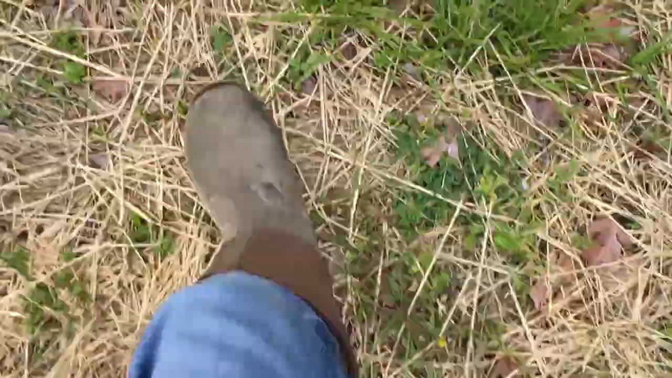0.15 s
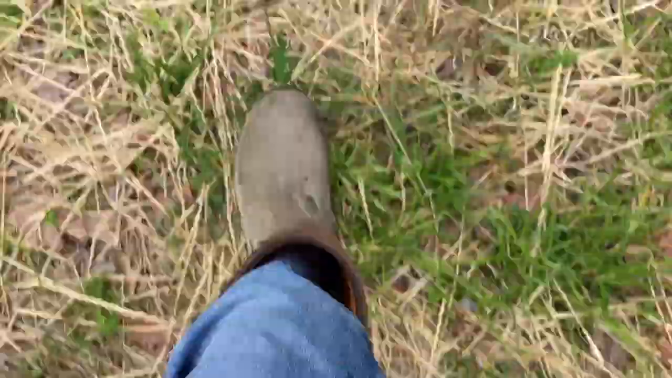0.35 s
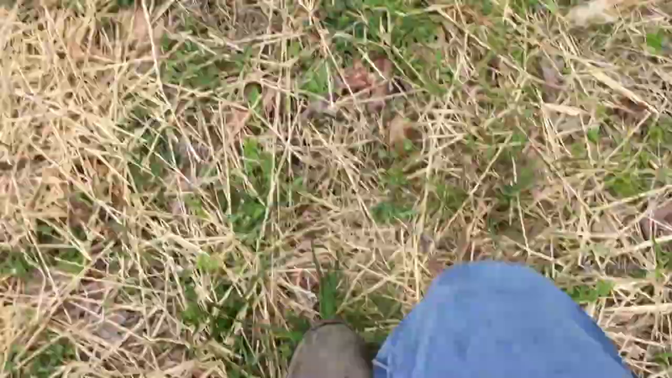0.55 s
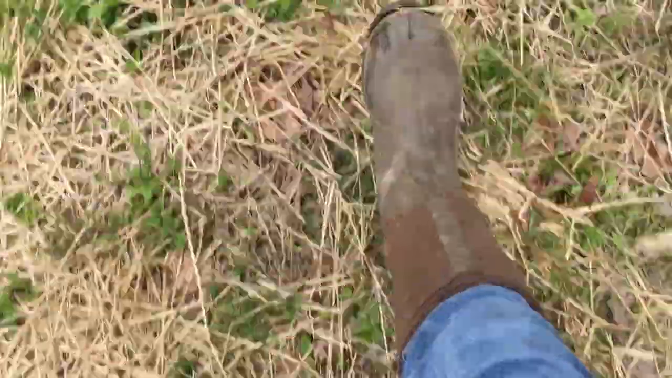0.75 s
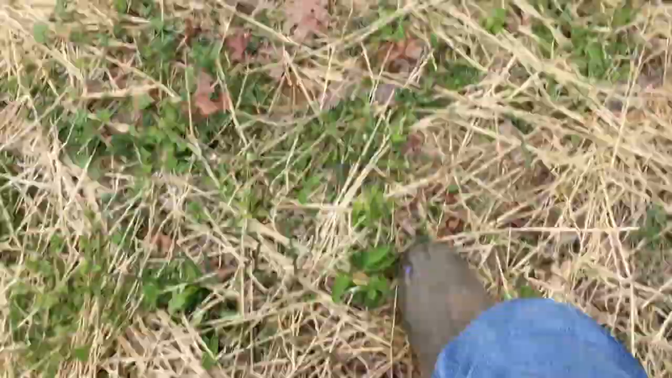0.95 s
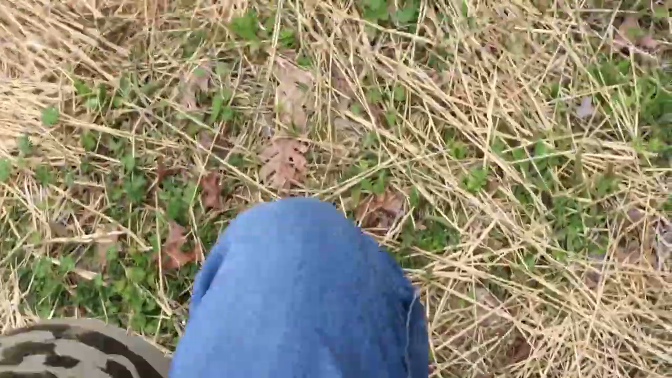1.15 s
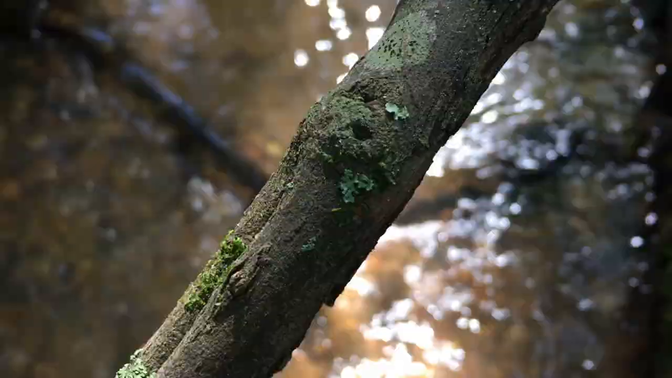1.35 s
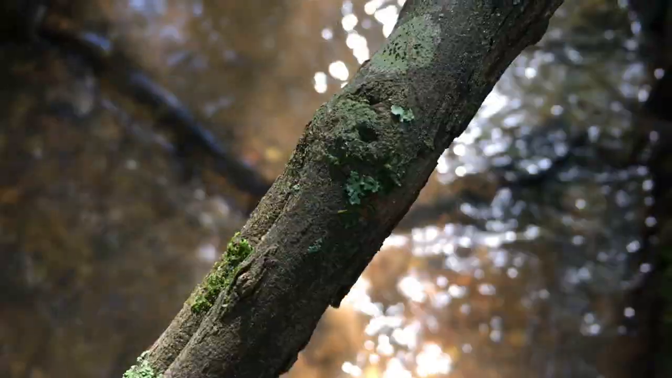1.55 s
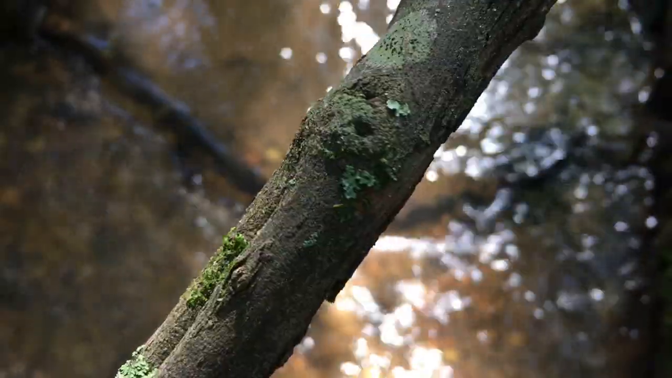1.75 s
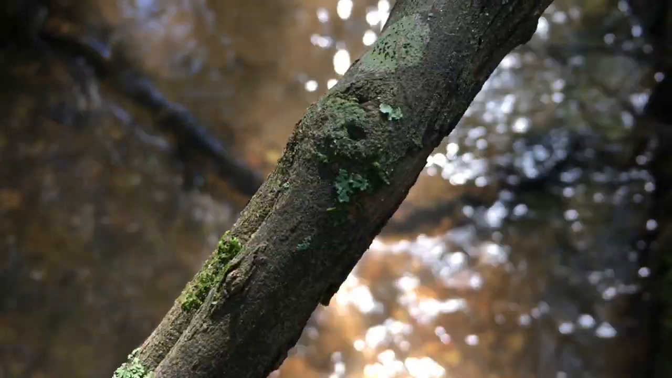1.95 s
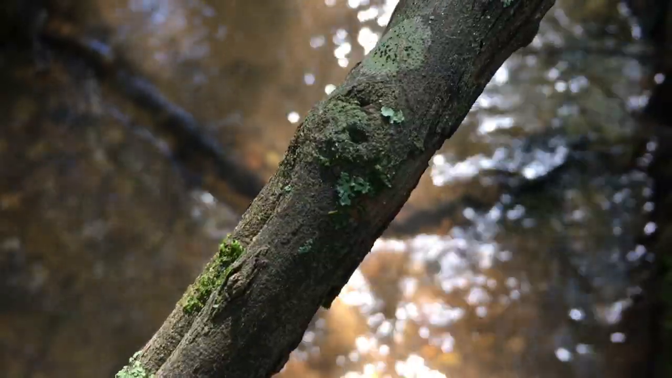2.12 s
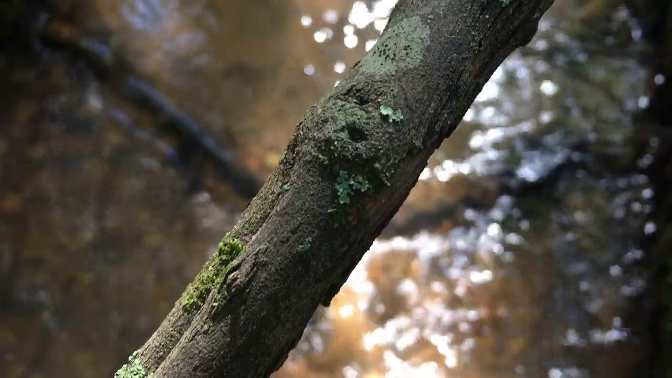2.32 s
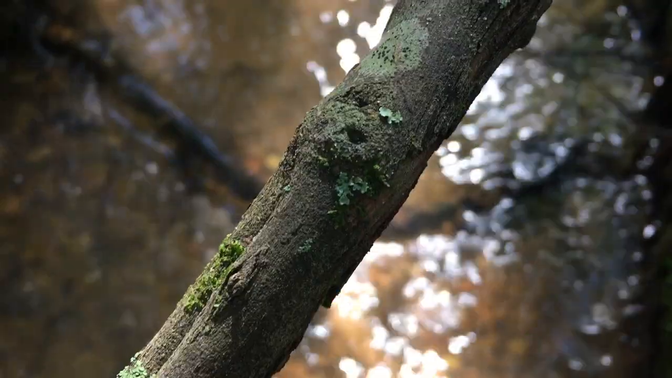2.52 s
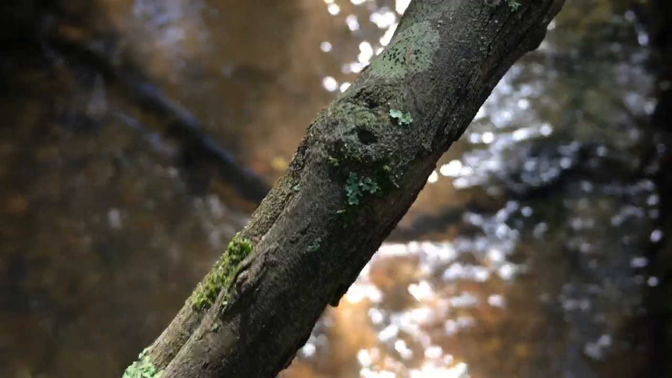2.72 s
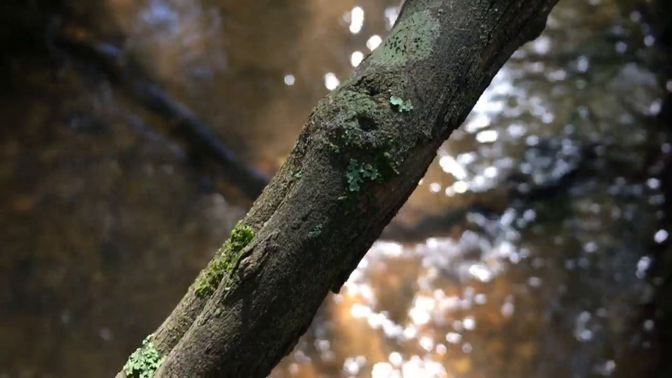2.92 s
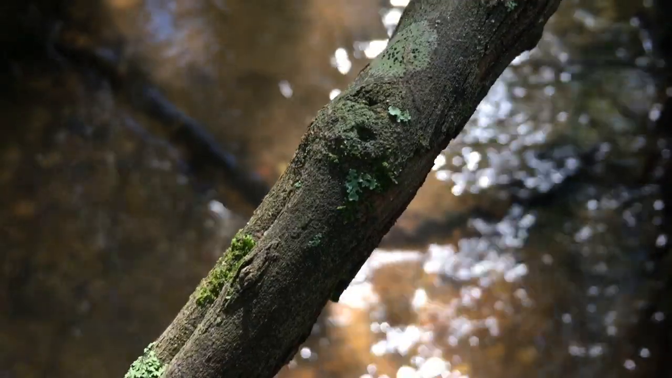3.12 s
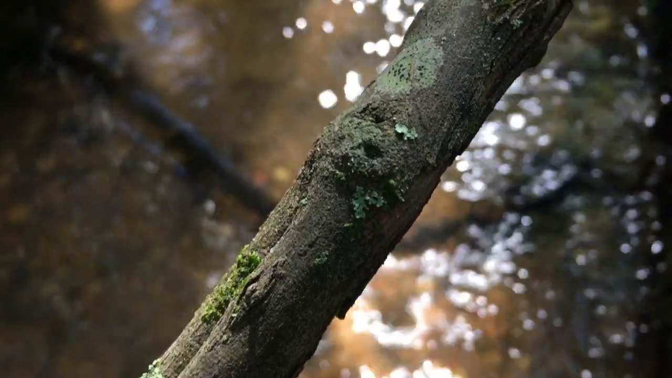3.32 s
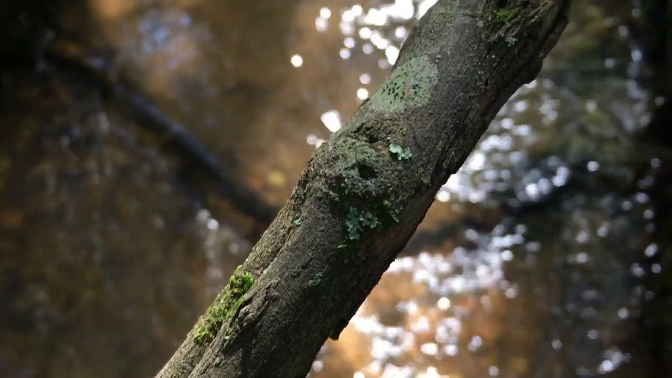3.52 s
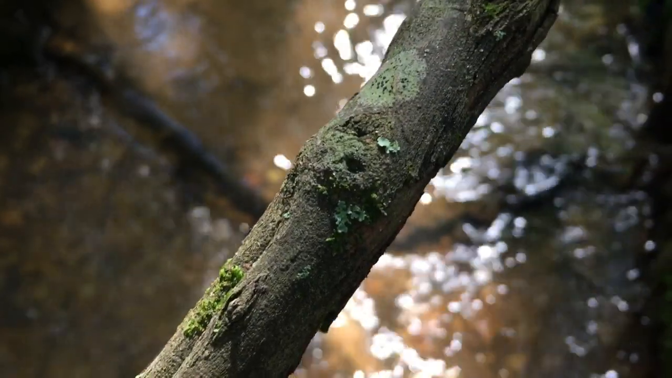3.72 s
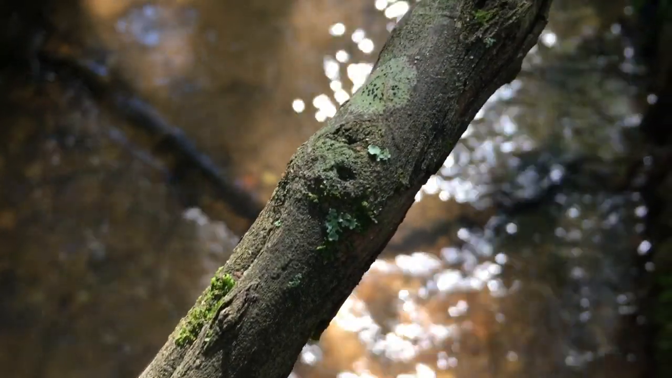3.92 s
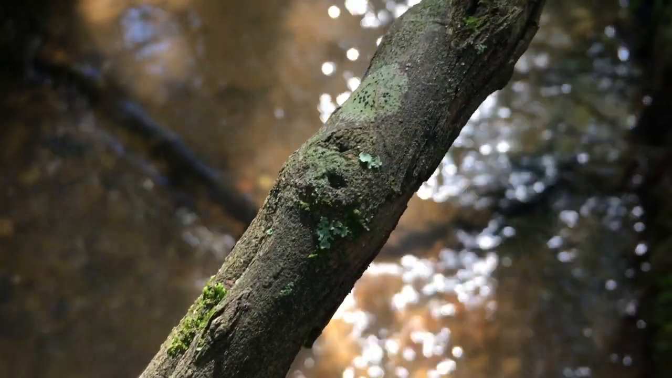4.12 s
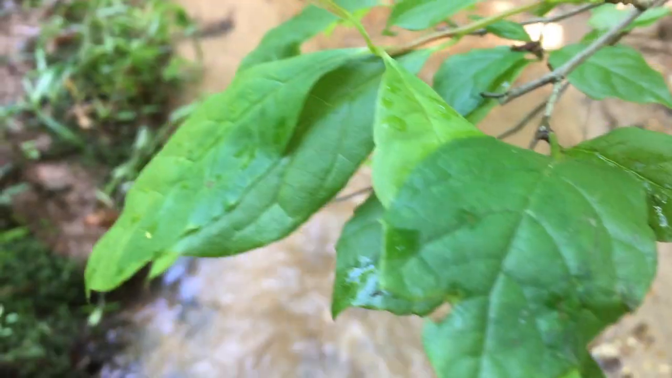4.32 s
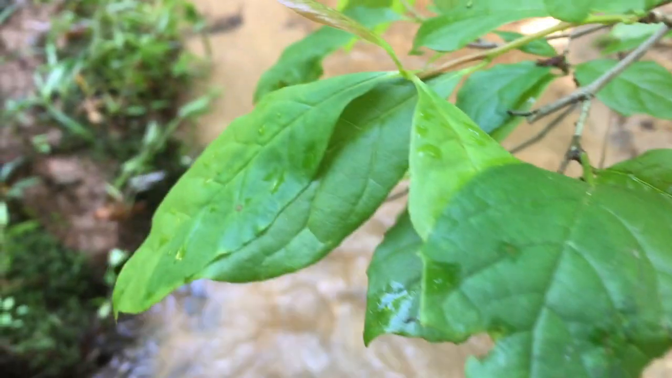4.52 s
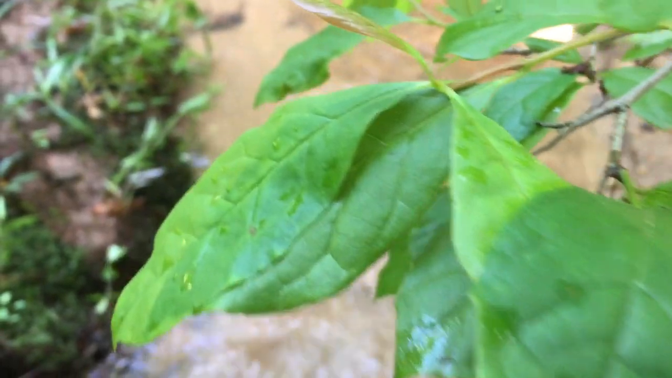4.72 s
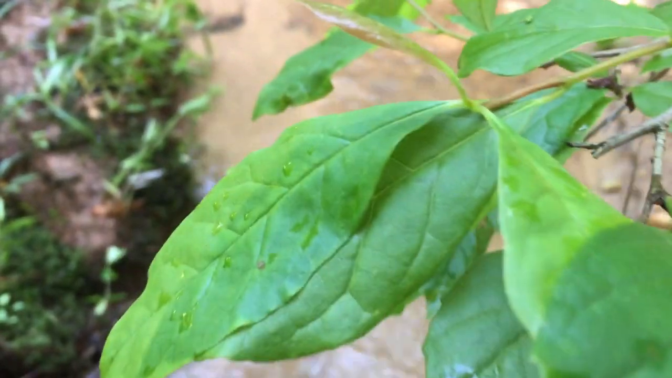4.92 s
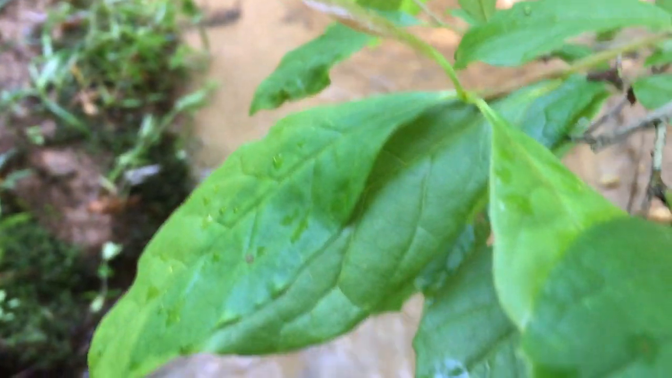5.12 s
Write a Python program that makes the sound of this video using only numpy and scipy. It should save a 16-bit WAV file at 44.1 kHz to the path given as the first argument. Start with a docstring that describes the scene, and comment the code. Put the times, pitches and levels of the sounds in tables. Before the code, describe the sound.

Mono, close and dry, outdoors. From 0 to 1.4 s rubber boots walk through dry grass and straw. A footfall lands right at the start, another around 0.4-0.5 s and a third near 0.97-1.05 s: heel then sole, dull, short thuds with brittle crunching and stalk snaps. Trouser cloth swishes briefly, brightening, at about 0.05, 0.63 and 1.13 s. Blades brush the boot between steps, strongest from 0.8 to 1.0 s, with a sharp, bright stem whip at 0.84 s. Low rumble follows the stride. At 1.44 s it cuts abruptly to a much quieter creek: a soft, steady wash, faint random trickling and tiny high ticks. Clearer liquid plinks sound near 2.06, 2.37, 3.33, 4.22 and 4.32 s, with a dull drop click at 3.5 s. Small bubbles grow denser after 4.6 s, with a slightly fizzier wash. Lumpy low outdoor rumble slowly grows and surges until about 5.3 s.

```python
"""First, rubber boots walk through dry grass and straw: noise-burst snaps and shaped crackle for stalks,
damped sine thuds for heels, resonant noise for a whipped stem and swishing trouser legs.
Then, abruptly, a quiet creek: a soft noise wash with small ringing bubbles (sines drifting in pitch),
ticking drops and faint sliding tones, over a low outdoor rumble of lumpy, surging noise."""
import sys
import numpy as np
from scipy import signal
from scipy.fft import rfft, irfft, next_fast_len
from scipy.io import wavfile
from scipy.ndimage import map_coordinates

SR = 44100
rng = np.random.default_rng(int(sys.argv[2]) if len(sys.argv) > 2 else 0)


def to_wav(s):
    """Save 16-bit WAV."""
    ch = np.atleast_2d(s).T  # columns
    pcm = np.round(np.clip(ch, -1, 1) * 32767)  # PCM
    wavfile.write(sys.argv[1], SR, pcm.astype(np.int16))


N = 232318
WALK_END_S = 1.437

# near bubbles in the creek: t/s, level/dB, nominal f/Hz, share by which pitch rises per ring time
BUBBLES = [(1.771, -61, 6060, 0), (2.033, -45, 1380, -0), (2.061, -32.5, 2280, -0.24),
           (2.2085, -58, 1940, 0), (2.212, -55, 4650, -0.1), (2.2445, -56.5, 3270, 0.2),
           (2.342, -50.5, 2210, -0), (2.3669, -37.5, 2660, 0.12), (2.7399, -56, 5900, -0.2),
           (2.896, -57.5, 1640, 0.25), (3.0428, -51.5, 3150, -0.1), (3.0525, -54, 3320, 0.09),
           (3.106, -48.5, 2324, 0.45), (3.106, -57.5, 1840, -0.2), (3.3262, -39.5, 1261, 0.49),
           (3.364, -56, 1255, 0.45), (3.792, -57, 2940, 0.3), (4.078, -49, 2236, 0.17),
           (4.2178, -37, 1784, -0.2), (4.2182, -48, 2560, -0.15), (4.229, -49.5, 2180, 0.3),
           (4.3174, -40, 2860, -0.2), (4.612, -47, 1460, -0.76), (4.6202, -56.5, 1065, -0.03),
           (4.66, -56, 1136, -0), (4.6727, -57, 2870, 0), (4.7206, -51.5, 3990, -0),
           (4.7272, -51, 2000, -0.4), (4.9153, -46, 1700, -0), (4.9253, -55.5, 3640, 0.2),
           (5.038, -59.5, 1170, 0.47), (5.0749, -48, 2540, 0.2), (5.1196, -51.5, 1843, -0.16),
           (5.1273, -50.5, 3710, 0.2), (5.141, -45.5, 4280, -0.1), (5.183, -54, 1190, 0.13)]
# steps, heel strike until sole lies flat: heel t/s, flat t/s, level/dB
STEPS = [(0.42, 0.48, -44.5), (0.974, 0.995, -40)]
STEP_RISE_DB_PER_S, STEP_FALL_DB_PER_S = 480, 340


def amp(db):
    """Decibels to gain."""
    return 10 ** (np.asarray(db) / 20)


def unit(x):
    """x at rms 1."""
    return x / np.sqrt(np.mean(x ** 2) + 1e-20)


def clock():
    """Time of every sample in s."""
    return np.arange(N) / SR


def curves(rows):
    """One value per sample for each column after the time."""
    s, *cols = np.transpose(rows)
    return [np.interp(clock(), s, c) for c in cols]


def wobble(knots_per_s):
    """Smooth random curve through normal knots."""
    knots = rng.standard_normal(int(N * knots_per_s / SR) + 4)
    return map_coordinates(knots, [np.arange(N) * knots_per_s / SR])


def filtered(x, response):
    """x times a complex response of frequency."""
    m = next_fast_len(len(x) + SR // 10)
    return irfft(rfft(x, m) * response(np.fft.rfftfreq(m, 1 / SR)), m)[:len(x)]


def shaped(x, points):
    """x through a filter of (f/Hz, level/dB) points that leaves white noise at its level."""
    f, db = np.transpose(points)
    return filtered(x, lambda hz: unit(amp(np.interp(np.log(hz + 1), np.log(f), db))))


def coloured(x, points):
    """x shaped by (f/Hz, level/dB) points, at rms 1."""
    return unit(shaped(x, points))


def resonance(f, hz, width_hz):
    """Response of one damped mode."""
    return 1j * f * width_hz / (hz * hz - f * f + 1j * f * width_hz)


def resonant_noise(count, hz, breadth):
    """Noise through a doubled mode whose width is breadth times its frequency."""
    return filtered(rng.standard_normal(count), lambda f: resonance(f, hz, breadth * hz) ** 2)


def add(track, s, sound):
    """Mix a sound into the track at time s."""
    part = track[max(round(s * SR), 0):][:len(sound)]
    part += sound[:len(part)]


def together(*gains):
    """Gain of unrelated sounds heard at once: powers add."""
    return np.sqrt(sum(g ** 2 for g in gains))


def swells(rows, rise_db_per_s, fall_db_per_s):
    """Gain of events that rise, hold from start to end and fall away."""
    t = clock()
    gains = []
    for start, end, db in rows:
        before = rise_db_per_s * np.maximum(start - t, 0)
        after = fall_db_per_s * np.maximum(t - end, 0)
        gains.append(amp(db - before - after))
    return together(*gains)


def crackle(rate_per_s, spread_db, rub):
    """Tiny fractures of uneven size on a bed of rubbing noise, rms 1."""
    sizes = amp(spread_db * np.minimum(rng.standard_normal(N), 2)) * rng.choice([-1, 1], N)
    fractures = unit(sizes * (rng.random(N) < rate_per_s / SR))
    return unit(fractures + rub * rng.standard_normal(N))


def cracks(rows, breadth):
    """Short noise bursts, each through its own broad resonance and an exponential decay."""
    out, t = np.zeros(N), np.arange(SR // 10) / SR
    for s, db, hz, t60_s in rows:
        burst = amp(-60 * t / t60_s) * resonant_noise(len(t), hz, breadth)
        add(out, s, amp(db - 3.5) * burst / np.abs(burst).max())
    return out


def outdoor_rumble():
    """Low noise whose level grows slowly, wavers in lumps and surges."""
    # spectrum: f/Hz, level/dB
    spectrum = [(20, -60), (30, -41), (40, -5.5), (52, -10), (72, 0.5), (84, -2), (97, -7), (150, -23.5),
                (300, -50), (800, -92)]
    # surges: start t/s, end t/s, level/dB
    surges = [(3.05, 3.085, -54), (3.32, 3.46, -52), (3.7, 3.72, -47), (3.83, 3.86, -48),
              (4.48, 4.52, -53.5), (5.08, 5.18, -54)]
    start_db, growth_db_per_s, lump_db, lumps_per_s, surge_db_per_s = -58.5, 0.56, 3.5, 27, 370
    level_db = start_db + growth_db_per_s * (clock() - WALK_END_S) + lump_db * wobble(lumps_per_s)
    gain = together(amp(level_db), swells(surges, surge_db_per_s, surge_db_per_s))
    return shaped(gain * rng.standard_normal(N), spectrum)


def stream():
    """The wash of the stream as wavering noise, with a fine crackling fizz."""
    # flow: t/s, wash level/dB, fizz level/dB
    flow = [(1.44, -68.5, -96), (3.0, -68.5, -84), (4.33, -68, -108), (4.45, -70, -77), (4.8, -68.5, -75),
            (5.27, -69.5, -74)]
    # wash spectrum: f/Hz, level/dB
    wash_spectrum = [(60, -10), (200, 8.5), (300, 4.5), (420, -1), (850, 4.5), (1400, -2), (2200, -6),
                     (4000, -8.5), (4900, -11.5), (6000, -11), (9300, -14), (10400, -18), (11500, -15),
                     (15800, -20)]
    fizz_spectrum = [(500, -34), (1200, -1.5), (3000, 2), (6000, -5), (15000, -8.5)]  # f/Hz, level/dB
    wash_db, fizz_db = curves(flow)
    wash = amp(wash_db + 0.99 * wobble(20)) * coloured(rng.standard_normal(N), wash_spectrum)
    fizz = amp(fizz_db) * coloured(crackle(rate_per_s=400, spread_db=1.5, rub=0.81), fizz_spectrum)
    return wash + fizz


def glide():
    """A narrow, wavering tone comes and goes faintly in the water."""
    # slides: start t/s, end t/s, first f/Hz, last f/Hz, level/dB
    slides = [(1.9, 2.3, 1850, 3300, -76.5), (4.9, 5.14, 3270, 2840, -81)]
    waver_db = 3.5
    out = np.zeros(N)
    for start, end, first_hz, last_hz, db in slides:
        u = np.clip((clock() - start) / (end - start), 0, 1)
        pitch_hz = first_hz * (last_hz / first_hz) ** u * (1 + .025 * wobble(250))
        tone = unit(np.sin(2 * np.pi * np.cumsum(pitch_hz) / SR))
        out += amp(db + waver_db * wobble(60)) * np.sin(np.pi * u) * tone
    return out


def spray(count, db):
    """The tiniest bubbles tick high up at random moments."""
    when, size, loud = rng.random((count, 3)).T
    s = WALK_END_S + (N / SR - WALK_END_S) * when
    ticks = np.transpose([s, db - 5 * loud, 5500 * 1.6 ** size, np.full(count, 0.016)])
    return cracks(ticks, breadth=0.19)


def splashes():
    """Falling drops click on the surface; some leave a bubble, some do not."""
    # drops without a bubble: t/s, level/dB, centre f/Hz, t60/s
    drops = [(2.976, -52, 9250, .006), (3.063, -54, 8500, 0.012), (3.124, -51, 2000, 0.0077),
             (3.3267, -51.5, 2470, 0.049), (3.509, -43.5, 1230, 0.011), (3.509, -47, 496, 0.015),
             (3.562, -53, 12500, .005), (3.85, -56, 9200, 0.022), (4.2995, -59, 1100, 0.014),
             (4.545, -57, 547, 0.052)]
    click_db, click_hz, click_t60_s = -19, 6000, 0.0098  # level relative to the bubble
    clicks = [(s, db + click_db, click_hz, click_t60_s) for s, db, _, _ in BUBBLES]
    return cracks(drops + clicks, breadth=0.35)


def trickle(start_s, end_s, db, count):
    """Faint bubbles at random moments; the small ones ring higher and shorter."""
    when, size, loud, drift = rng.random((count, 4)).T
    s = start_s + (end_s - start_s) * when
    hz = 1000 * 7 ** size
    t60_s = 0.15 * np.sqrt(1000 / hz)
    return np.transpose([s, db - 7 * loud - 9 * size, hz, t60_s, 0.93 * (drift - .5)])


def ring_time(db, hz):
    """Ring t60 in s: small, high bubbles and hard-struck ones die away sooner."""
    soft_1khz_t60_s, shrink_power, loss_db = 0.088, 0.98, -32
    return soft_1khz_t60_s * (1000 / hz) ** shrink_power / (1 + 0.35 * amp(db - loss_db))


def bubbles(rows, pinch, onset_cycles):
    """Each bubble starts sharp as it pinches off, settles, then drifts in pitch as it moves under the surface."""
    out, t = np.zeros(N), np.arange(SR // 8) / SR
    for s, db, hz, t60_s, rise in rows:
        shiver = np.interp(t * 300, np.arange(40), rng.standard_normal(40))
        drift = rise * (t / t60_s - .15)
        pitch_hz = hz * (1 + pinch * np.exp(-t / 0.00082) + drift + 0.0086 * shiver)
        softness = onset_cycles * (1 + amp(-62.0 - db))  # faint bubbles slip free more gently
        swell = 1 - np.exp(-(t * hz / softness) ** 1.5)
        surfacing = np.exp(-(t / (0.72 * t60_s)) ** 4)  # the ring stops as the bubble reaches the air
        ring = np.sin(2 * np.pi * np.cumsum(pitch_hz) / SR)
        add(out, s, amp(db - 60 * t / t60_s) * swell * surfacing * ring)
    return out


def banks(x, t60_s):
    """The banks scatter a short answer: x through a decaying noise tail of unit energy."""
    t = np.arange(SR // 3) / SR
    tail = rng.standard_normal(len(t)) * amp(-60 * t / t60_s) * (t > .003)
    return signal.fftconvolve(x, tail / np.linalg.norm(tail))[:N]


def creek():
    """Bubbles and drops, answered weakly by the banks, on the stream and the rumble."""
    plinks = [(s, db, hz, ring_time(db, hz), rise) for s, db, hz, rise in BUBBLES]
    steady = trickle(WALK_END_S, N / SR, db=-64, count=80)
    late = trickle(5.0, N / SR, db=-62.5, count=20)
    near = bubbles(plinks, pinch=.12, onset_cycles=.9)
    near += bubbles(np.vstack([steady, late]), pinch=0.051, onset_cycles=0.68)
    near += splashes() + spray(count=12, db=-56.5)
    return near + amp(-10) * banks(near, t60_s=0.075) + glide() + stream() + outdoor_rumble()


def trousers():
    """Cloth slides on cloth, brighter as the leg speeds up: noise fades from a low to a higher resonance."""
    # legs passing each other: start t/s, end t/s, level/dB, first f/Hz, last f/Hz
    passes = [(0.03, 0.092, -42.5, 1940, 2880), (0.607, 0.66, -46.5, 2780, 4330),
              (1.106, 1.169, -44, 1890, 3550)]
    out = np.zeros(N)
    for start, end, db, first_hz, last_hz in passes:
        u = np.linspace(0, 1, max(round((end - start) * SR), 2))
        early = unit(resonant_noise(len(u), first_hz, 1.03))
        late = unit(resonant_noise(len(u), last_hz, 1.03))
        cloth = np.sqrt(1 - u) * early + np.sqrt(u) * late
        add(out, start, amp(db) * signal.windows.tukey(len(u), .2) * cloth)
    return out


def stem():
    """A stiff stem whips over the boot: a quick scrape swells and dies in its resonances."""
    # resonances: f/Hz, width/Hz, relative level/dB
    modes = [(1160, 820, -8.5), (2920, 200, 1), (3750, 270, -5), (5830, 370, 1), (7230, 210, 0),
             (8100, 500, -5.5), (9000, 590, -10.5), (9700, 270, -5), (12440, 1700, -13.5),
             (15100, 1300, -13)]
    t = clock() - .8425
    stroke = amp(-60 * np.maximum(-t / 0.021, t / 0.035))

    def body(f):
        """Sum of the modes with alternating sign."""
        return sum((-1) ** k * amp(db) * resonance(f, hz, width) for k, (hz, width, db) in enumerate(modes))

    return amp(-24.0) * stroke * unit(filtered(rng.standard_normal(N), body))


def stride_rumble():
    """Low noise follows the stride; each step adds to it."""
    # stride: t/s, level/dB
    stride = [(0, -46.5), (0.35, -49.5), (0.72, -48), (0.9, -44), (1.17, -46), (1.29, -43), (1.36, -53)]
    # spectrum: f/Hz, level/dB
    spectrum = [(20, -38), (40, -21), (60, -3), (85, -2.5), (103, 0), (125, -7.5), (170, -16.5), (300, -29),
                (800, -63)]
    step_db = -2
    steps = amp(step_db) * swells(STEPS, STEP_RISE_DB_PER_S, STEP_FALL_DB_PER_S)
    return together(amp(curves(stride)[0]), steps) * coloured(rng.standard_normal(N), spectrum)


def boots():
    """Heel, sole and stalk knocks: heavily damped sines with a gritty edge."""
    # heel and sole meet the ground: t/s, level/dB, pitch factor [1], ring time factor [1]
    footfalls = [(0.002, -27, 0.79, 0.86), (0.391, -34.5, 0.7, 2.2), (0.421, -27, 1.32, 0.8),
                 (0.513, -22, 1.02, 1.08), (0.61, -31, 1.44, 0.64), (0.69, -34.5, 1.62, 0.86),
                 (0.973, -25, 1.8, 0.56), (1.008, -33.5, 0.9, 1.0), (1.026, -30.5, 0.81, 1.9),
                 (1.052, -22, 0.99, 1.1), (1.413, -38.5, 0.38, 3.2)]
    # modes of boot on soft ground: f/Hz, relative level/dB, t60/s
    ground = [(73.5, -7, 0.062), (180.5, 1, 0.02), (293, -3, 0.022), (500, -5, 0.02)]
    # thick stalks knock under the mat: t/s, level/dB, f/Hz
    knocks = [(0.084, -32, 735), (0.21, -34.5, 604), (0.974, -32, 1310), (1.173, -37, 694),
              (1.204, -35.5, 2090), (1.298, -41, 686), (1.329, -42.5, 1070), (1.378, -34, 2220),
              (1.433, -46, 1010)]
    knock_t60_s = 0.02
    hits = [(s, db, hz, knock_t60_s) for s, db, hz in knocks]
    for s, db, pitch, ring in footfalls:
        hits += [(s, db + level, hz * pitch, t60_s * ring) for hz, level, t60_s in ground]
    out, t = np.zeros(N), np.arange(SR // 5) / SR
    for s, db, hz, t60_s in hits:
        grit = unit(resonant_noise(len(t), hz, 0.73))
        envelope = amp(db + 3.0 - 60 * t / t60_s) * (1 - np.exp(-2 * t * hz))
        add(out, s, envelope * (np.sin(2 * np.pi * hz * t) + 0.51 * grit))
    return out


def gait():
    """How hard the steps, rolls and sweeps press, crunch and brush the straw, as gains."""
    # weight rolls forward and crushes the straw: start t/s, end t/s, level/dB
    rolls = [(0.065, 0.145, -49), (0.585, 0.63, -46.5), (1.13, 1.17, -46.5)]
    # boot ploughs through standing grass: start t/s, end t/s, brush level/dB, crunch level/dB, fall/(dB/s)
    sweeps = [(0.366, 0.447, -52, -59.5, 192), (0.48, 0.499, -46, -46, 200.5),
              (0.529, 0.596, -49.5, -53, 92), (0.684, 0.711, -51.5, -57, 111.5),
              (0.806, 0.889, -46.5, -49.5, 147.5), (0.923, 1.006, -43, -45, 423.5)]
    roll_rise_db_per_s, roll_fall_db_per_s, sweep_rise_db_per_s = 296.5, 208.5, 418.5
    roll_press_db, roll_brush_db, sweep_press_db = -3, -25, -20
    # trodden straw never quite settles
    rest_press_db, rest_crunch_db, rest_brush_db, rest_fade_db_per_s = -57.5, -62, -61.5, 5
    step = swells(STEPS, STEP_RISE_DB_PER_S, STEP_FALL_DB_PER_S)
    roll = swells(rolls, roll_rise_db_per_s, roll_fall_db_per_s)
    blades, breaking = np.zeros(N), np.zeros(N)
    for start, end, brush_db, crunch_db, fall in sweeps:
        blades = together(blades, swells([(start, end, brush_db)], sweep_rise_db_per_s, fall))
        breaking = together(breaking, swells([(start, end, crunch_db)], sweep_rise_db_per_s, fall))
    press = together(step, amp(roll_press_db) * roll, amp(sweep_press_db) * blades, amp(rest_press_db))
    crunch = together(roll, breaking, amp(rest_crunch_db))
    rest_brush = amp(rest_brush_db - rest_fade_db_per_s * clock())
    brush = together(blades, amp(roll_brush_db) * roll, rest_brush)
    return press, crunch, brush


def stalks(count, db, spread_db):
    """Single stalks give way, most often where the straw is crushed hardest; each ticks at its own pitch."""
    crunching = gait()[1][:round(WALK_END_S * SR)]
    when, pitch, size = rng.random((count, 3)).T
    load = np.cumsum(crunching)
    at = np.searchsorted(load, when * load[-1])
    level_db = 20 * np.log10(crunching[at]) + db - spread_db * size
    hz = 1200 * 7 ** pitch
    t60_s = 0.008 * np.sqrt(2000 / hz)
    return cracks(np.transpose([at / SR, level_db, hz, t60_s]), breadth=0.5)


def straw():
    """The sole presses the mat, stalks crunch in clumps and snap, dry blades brush the boot."""
    # press spectrum: f/Hz, level/dB
    press_spectrum = [(100, -10.5), (220, 2.5), (380, -5), (550, -3.5), (900, -4), (1500, -11.5),
                      (4000, -49)]
    # crunch spectrum: f/Hz, level/dB
    crunch_spectrum = [(400, -14), (900, -3.5), (1600, -0.5), (3000, -5), (4800, -13), (6000, -10),
                       (8500, -32), (16000, -65)]
    # brush spectrum: f/Hz, level/dB
    brush_spectrum = [(1500, -8), (4000, 6), (4900, 1.5), (5800, 5.5), (7200, 2.5), (9000, 3.5), (10300, 0),
                      (12000, 3.5), (15800, 3)]
    # stalks breaking: t/s, level/dB, centre f/Hz, t60/s
    snaps = [(.0045, -32, 6500, 0.027), (.004, -30, 1790, 0.02), (.0335, -32, 2770, 0.014),
             (.1425, -31, 10500, 0.007), (.254, -47, 11000, 0.024), (.284, -50, 2000, 0.012),
             (.418, -29, 2020, 0.027), (.424, -31.5, 2130, 0.013), (.489, -27.5, 10000, 0.027),
             (.5126, -28.5, 1450, 0.014), (.516, -28, 10000, .007), (.6032, -20, 5600, 0.0061),
             (.842, -19.5, 13000, 0.007), (.856, -20, 7040, 0.0058), (.9315, -23.5, 5830, 0.024),
             (.969, -21.5, 1560, 0.022), (.973, -23.5, 3350, 0.028), (1.054, -29, 1060, 0.035),
             (1.055, -34.5, 3500, 0.11), (1.112, -32, 1620, 0.012), (1.379, -37.5, 1820, 0.11)]
    pressing, crunching, brushing = gait()
    clumps = wobble(130)
    mat = coloured(crackle(rate_per_s=900, spread_db=2.0, rub=0.85), press_spectrum)
    press = pressing * amp(2.3 * clumps) * mat
    breaking = coloured(crackle(rate_per_s=1100, spread_db=6, rub=1.0), crunch_spectrum)
    crunch = crunching * amp(-1.5 + 0.7 * clumps) * breaking
    blades = coloured(crackle(rate_per_s=1900, spread_db=3.5, rub=0.6), brush_spectrum)
    brush = brushing * amp(2.1 + 1.5 * clumps) * blades
    return press + crunch + brush + amp(-0.5) * cracks(snaps, breadth=0.71)


def scene():
    """The walk gives way at once to the creek."""
    walking = np.clip((WALK_END_S - clock()) / .003, 0, 1)  # 3 ms crossfade
    walk = trousers() + stem() + stride_rumble() + boots()
    walk += stalks(count=60, db=12.5, spread_db=10.5) + straw()
    return (walking * walk + (1 - walking) * creek())[None]


def record(dry):
    """Nothing passes at or above the band limit; a doubled high-pass thins the deepest bass."""
    low_cut_hz, top_hz = 23.7, 15850

    def band(hz):
        """Response of the band limits."""
        return (hz < top_hz) * (1j * hz / (low_cut_hz + 1j * hz)) ** 2

    return np.array([filtered(channel, band) for channel in dry])


dry = scene()
out = record(dry)
to_wav(out)
```